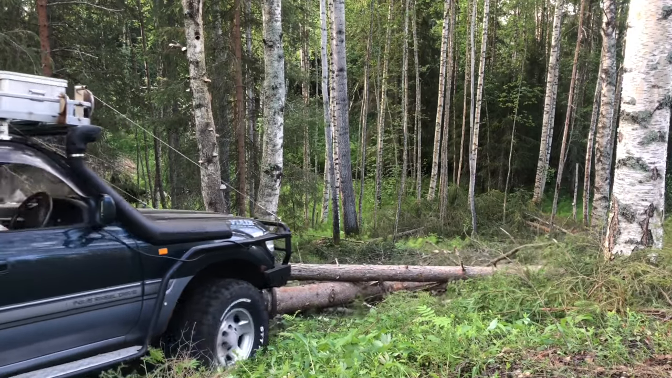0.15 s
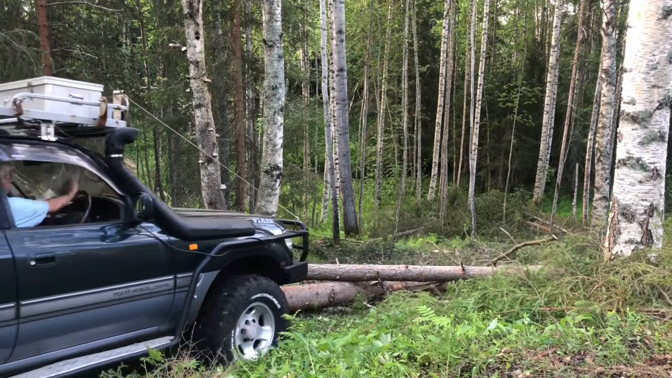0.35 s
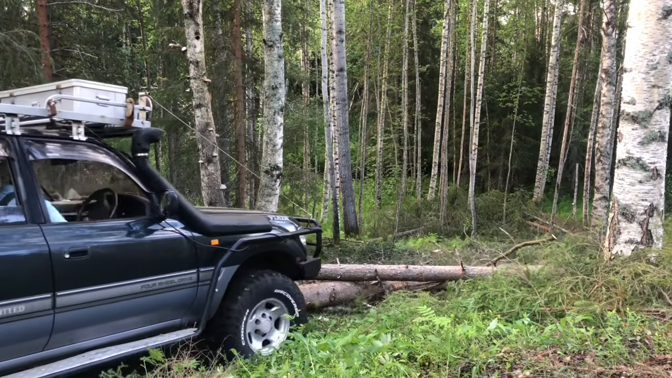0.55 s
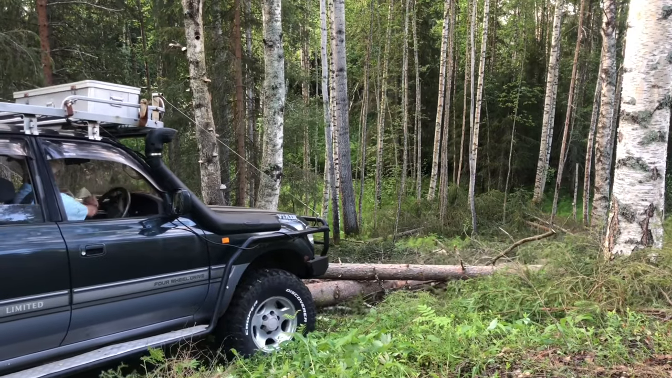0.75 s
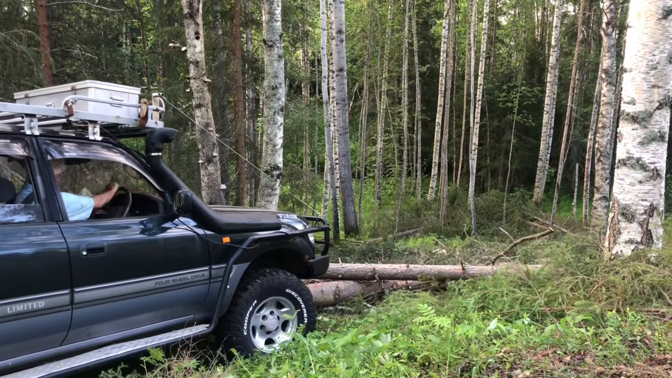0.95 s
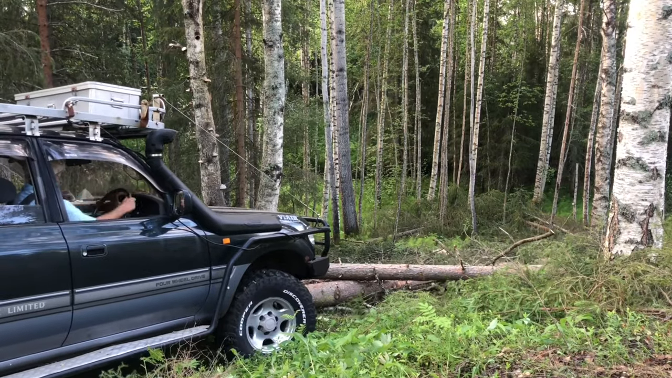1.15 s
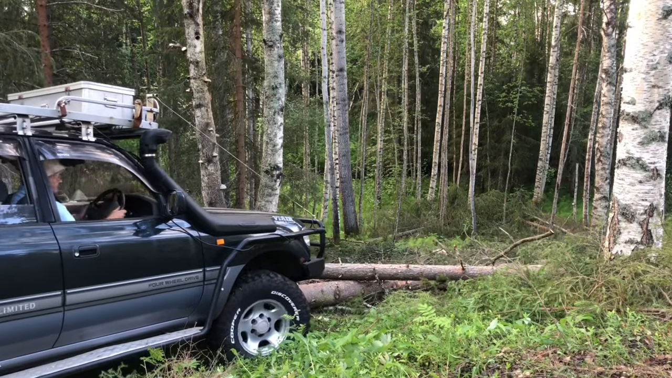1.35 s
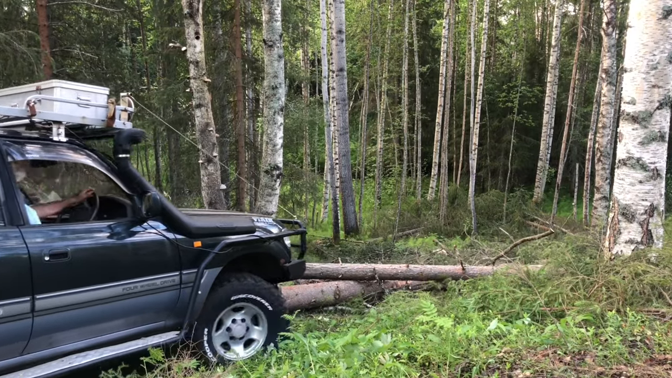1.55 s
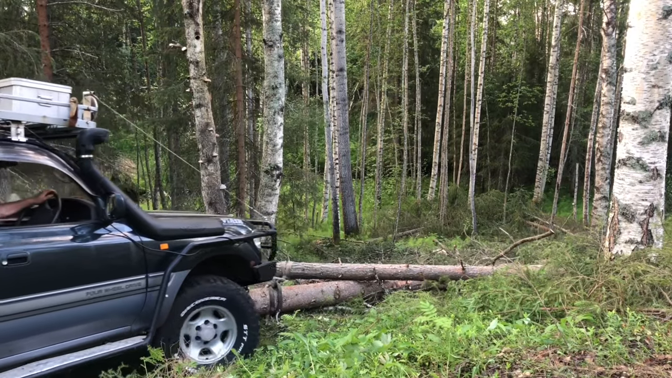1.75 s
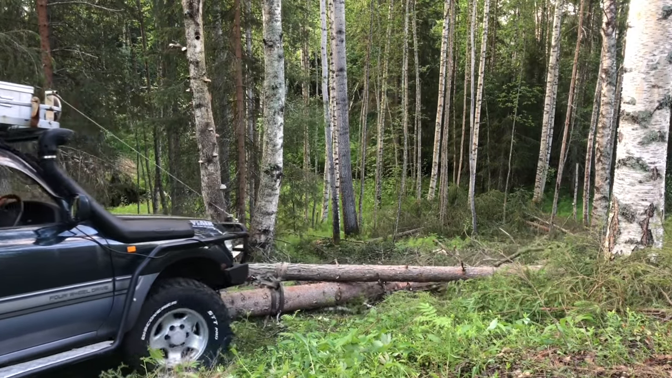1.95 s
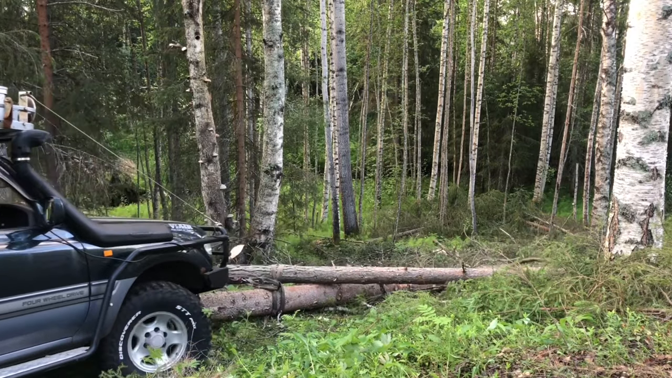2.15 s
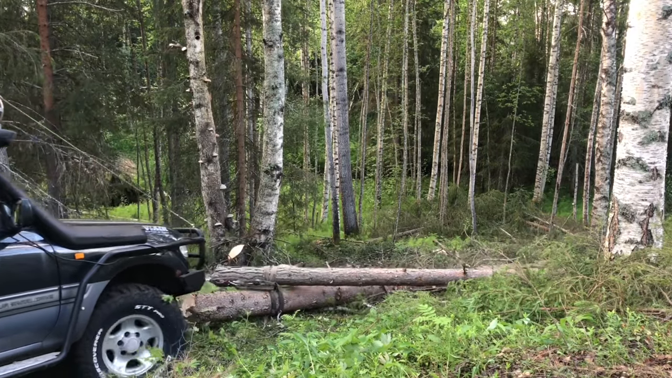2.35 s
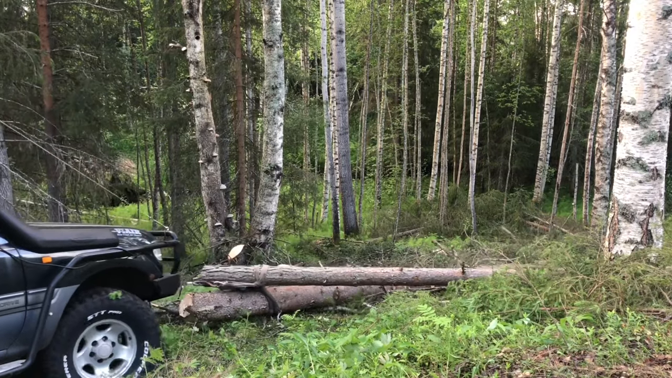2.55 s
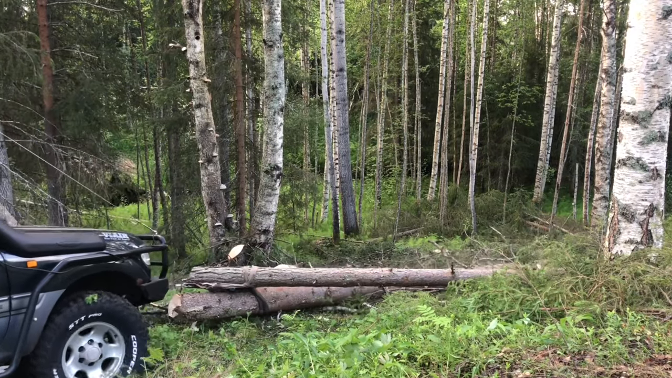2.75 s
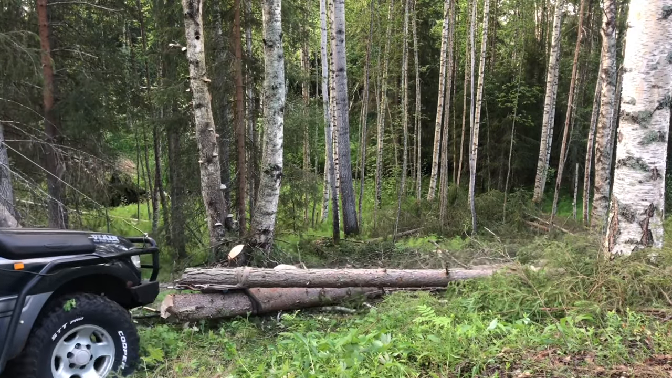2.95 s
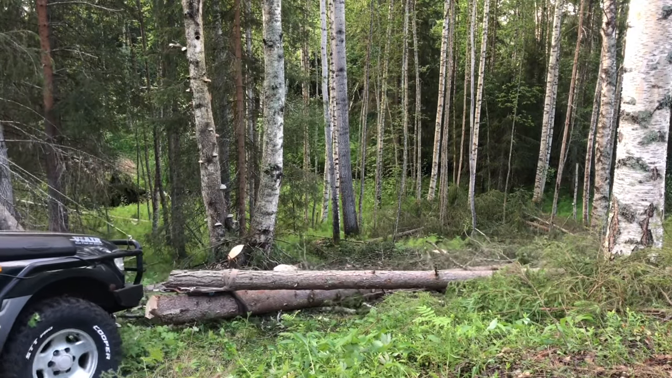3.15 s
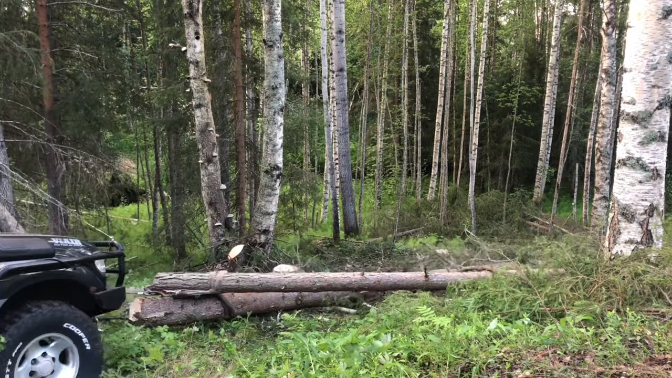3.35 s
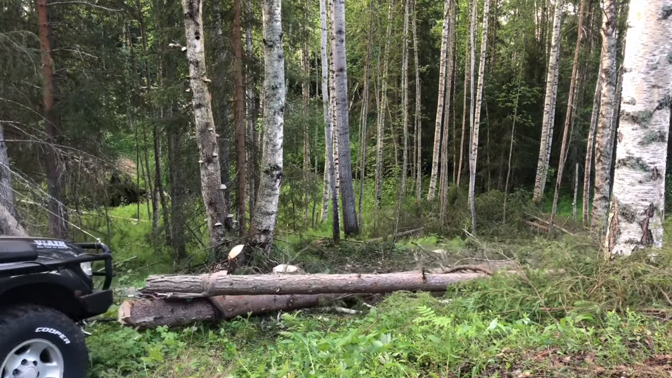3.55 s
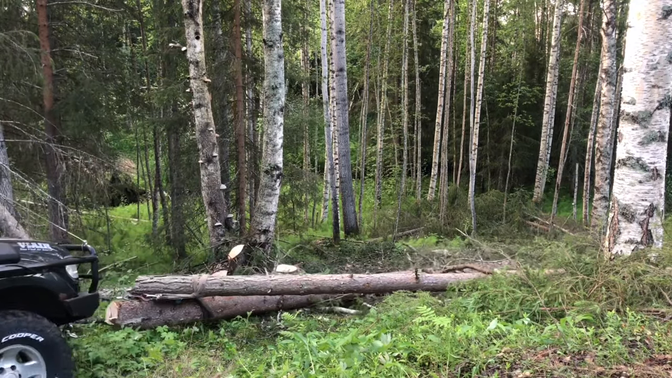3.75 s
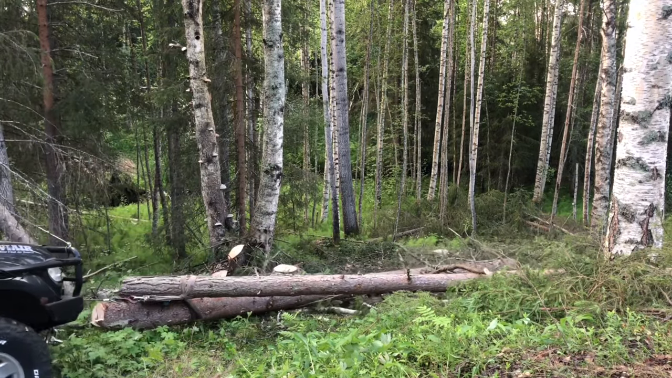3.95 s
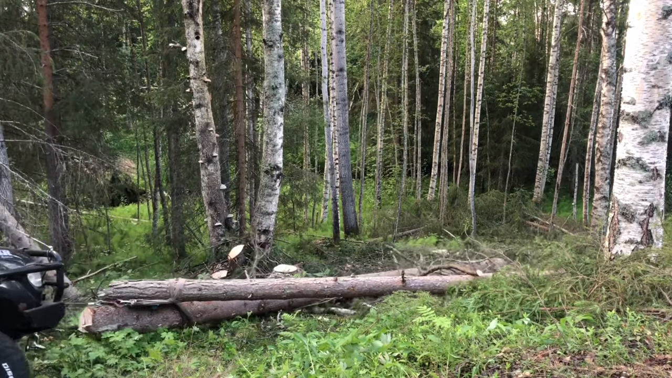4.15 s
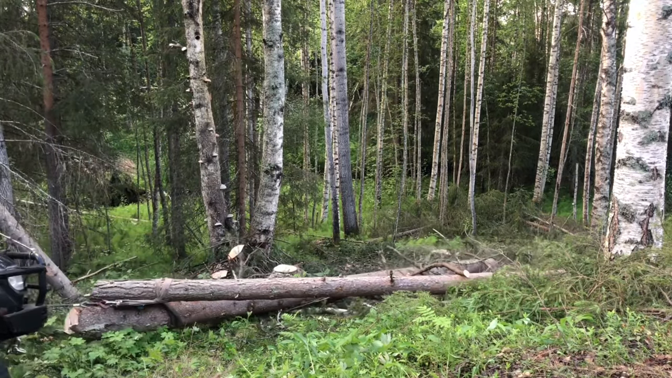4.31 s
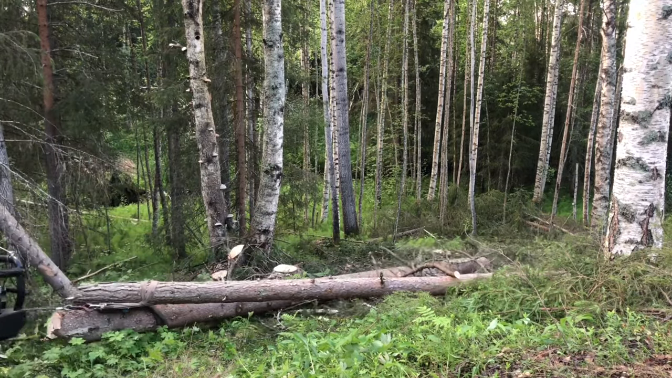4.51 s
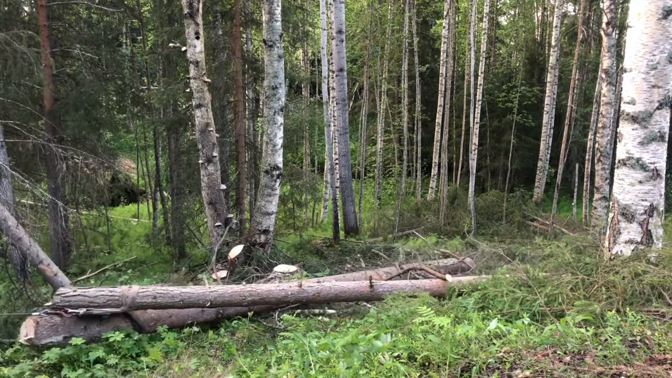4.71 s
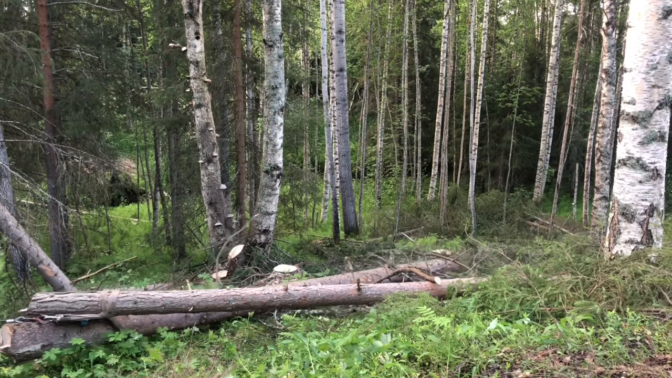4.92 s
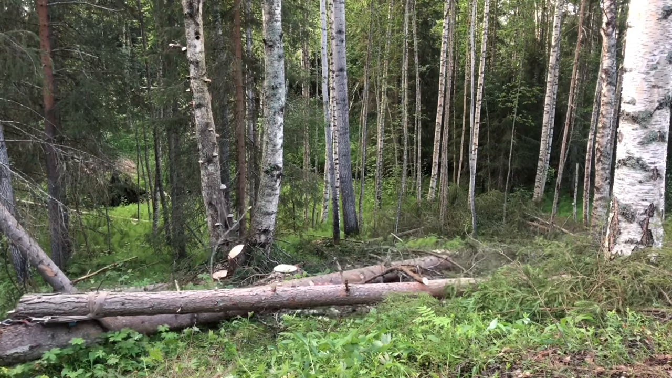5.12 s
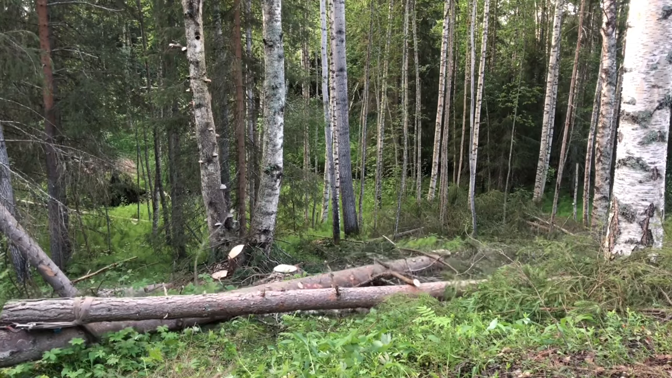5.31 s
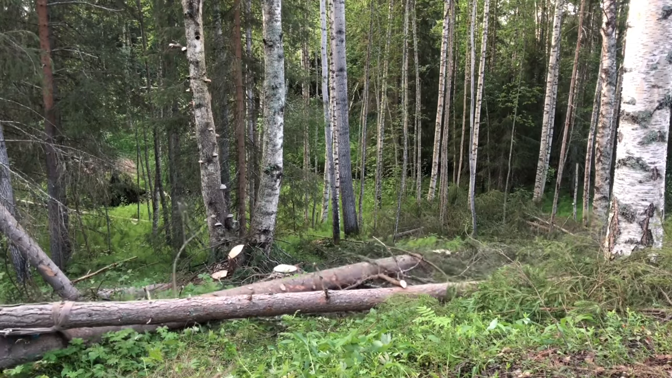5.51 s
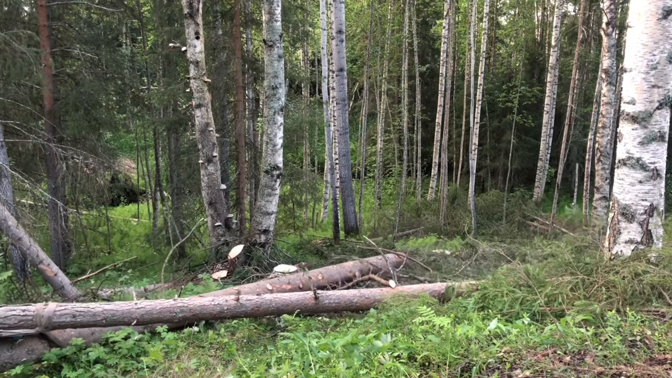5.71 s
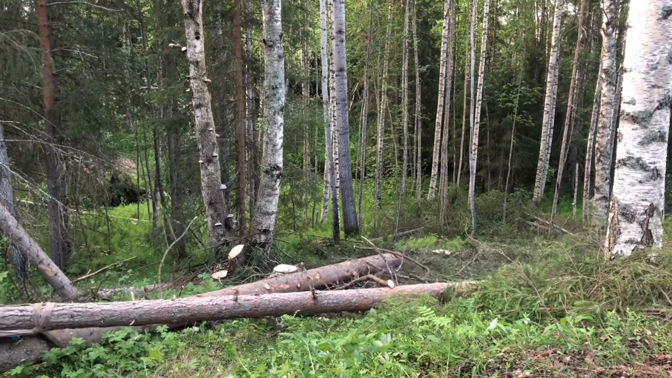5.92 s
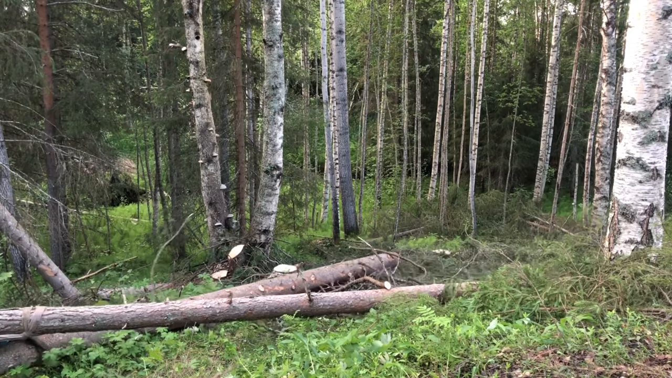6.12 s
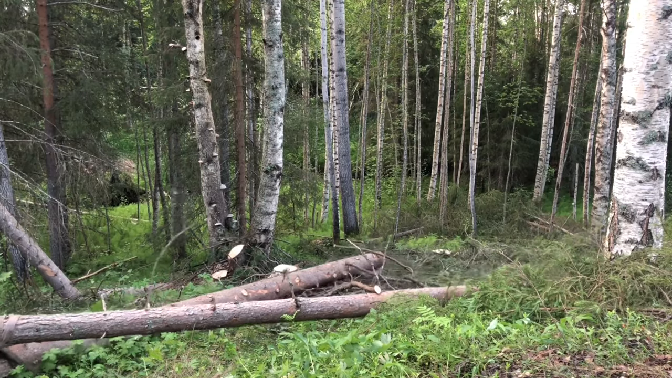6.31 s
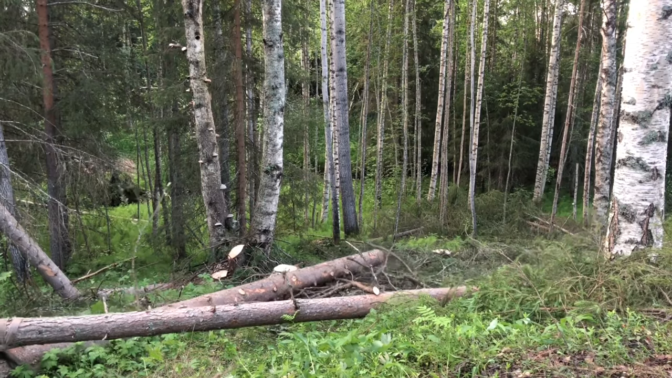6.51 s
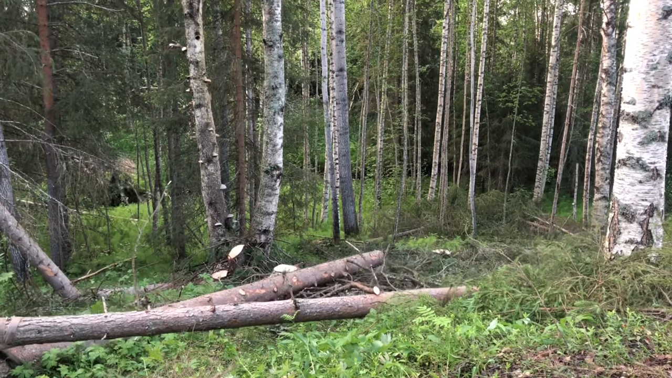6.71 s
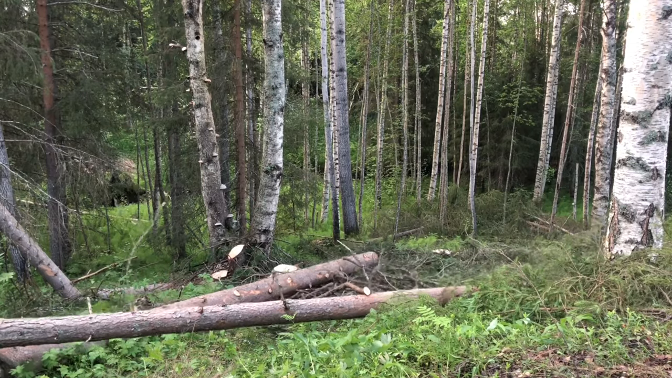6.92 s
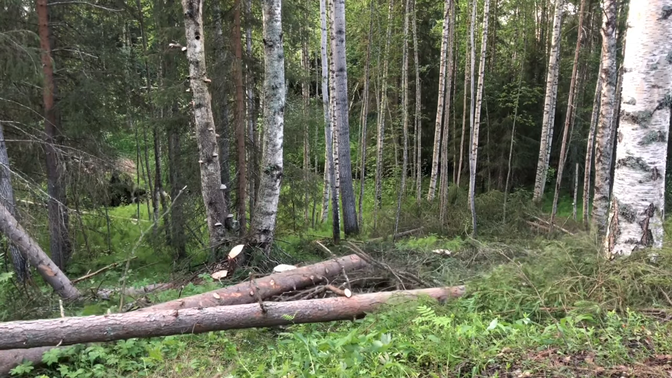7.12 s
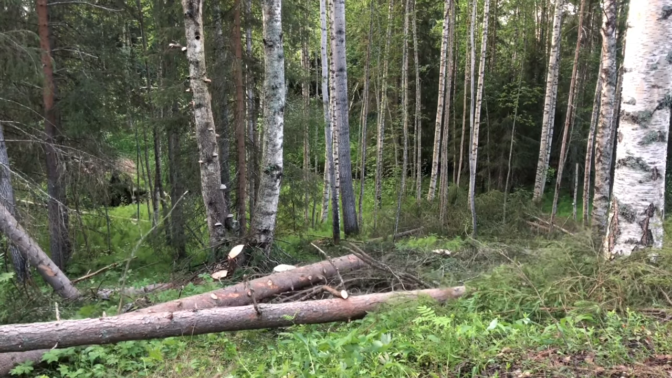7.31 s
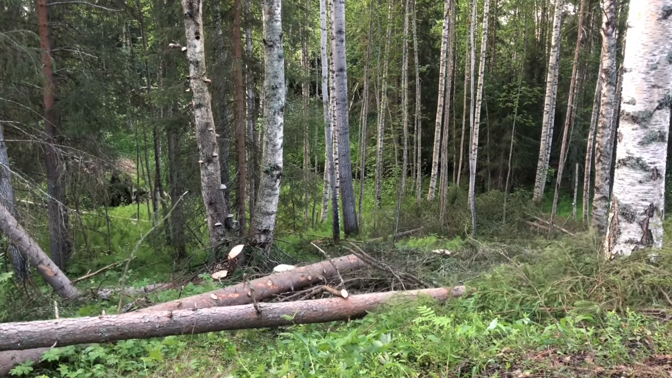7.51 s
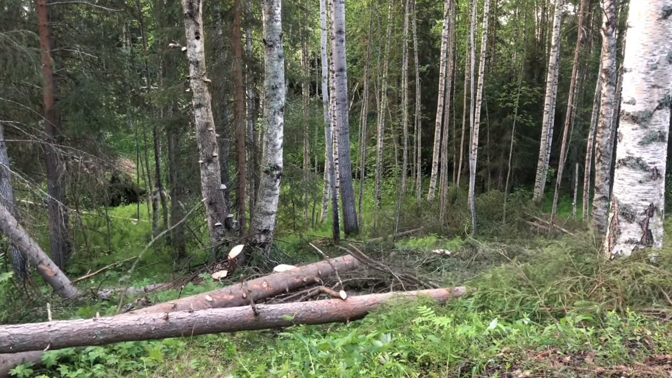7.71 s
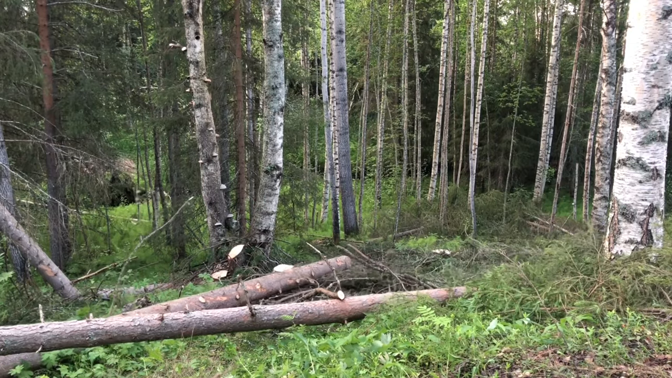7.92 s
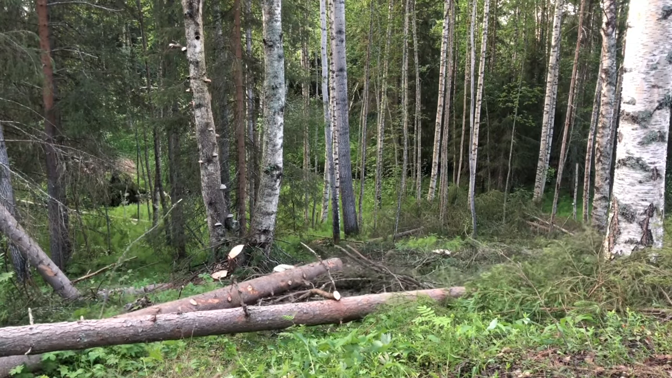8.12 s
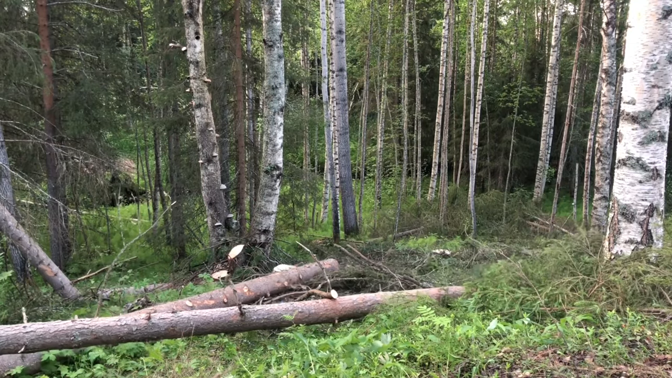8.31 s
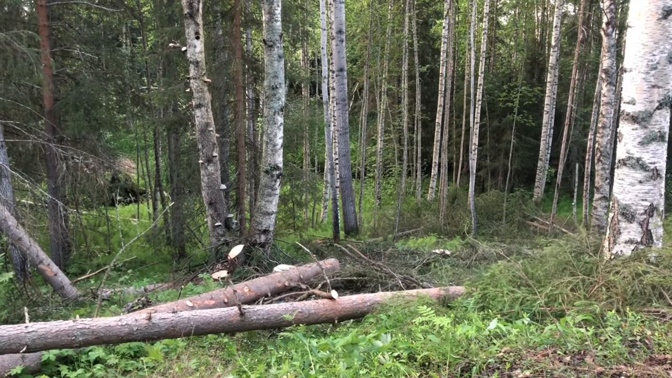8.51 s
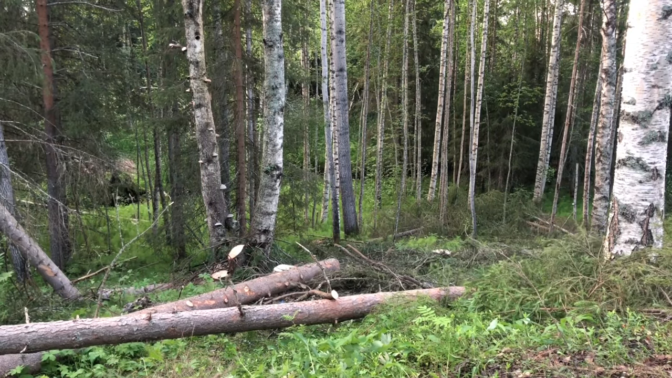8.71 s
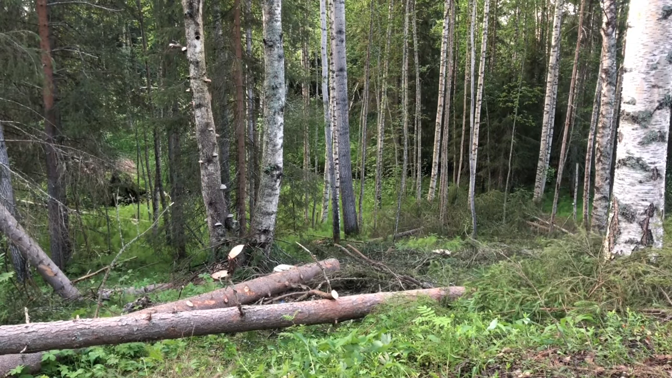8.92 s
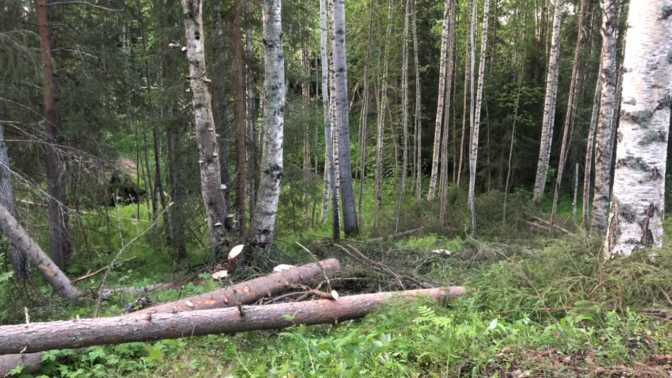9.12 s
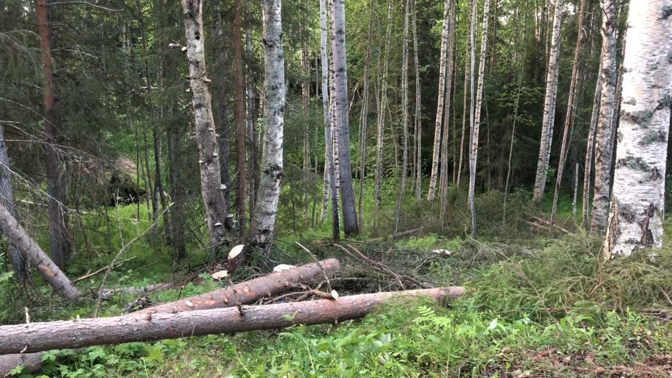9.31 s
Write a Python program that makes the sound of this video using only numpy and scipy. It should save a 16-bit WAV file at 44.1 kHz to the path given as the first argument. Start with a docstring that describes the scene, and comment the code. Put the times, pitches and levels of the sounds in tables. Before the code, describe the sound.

In a forest, an off-road vehicle backs past a stationary microphone, towing logs. Quiet idle gives way to rising throttle surges, a sustained heavy pull, then separate booming revs that drop between presses. Leaves swish, twigs snap, branches crack in dense bursts, sticks ring briefly and timber thuds dully. Late on, the engine sinks back to idle with a few last scrapes.

```python
"""A six-cylinder four-wheel-drive reverses past in a forest, towing logs through the undergrowth.
Its engine idles, then booms in surges of throttle: tones and noise locked to the engine cycle make exhaust,
clatter and fan. Brush rustles and crackles as filtered noise and random snaps; branches splinter as dense
swarms of snaps, logs knock as duller ones, and sticks ring as resonating noise.
The trunks scatter the sounds of the wood and leaves back as a short, soft echo."""
import sys
import numpy as np
from scipy import signal
from scipy.fft import rfft, irfft, next_fast_len
from scipy.io import wavfile
from scipy.ndimage import uniform_filter1d

SR = 44100
rng = np.random.default_rng(int(sys.argv[2]) if len(sys.argv) > 2 else 0)


def persist_wave(psi):
    """Save psi, clipped to +-1, as 16-bit WAV."""
    counts = np.round(np.clip(psi, -1, 1) * 32767).astype(np.int16)
    wavfile.write(sys.argv[1], SR, np.atleast_2d(counts).T)


N = 412754
T = np.arange(N) / SR

# Engine speed here is the rate of one three-cylinder bank, half the firing rate.
IDLE_HZ = 30.07
# throttle surges: (pedal down [s], rise time [s], speed aimed for [Hz], pedal held [s],
# fall time [s], speed it drops towards [Hz])
THROTTLE_SURGES = [(1.214, .125, 43.5, .363, .202, 36.4), (2.03, .151, 48.4, .344, .161, 40.6),
                   (2.638, .18, 55.1, 2.144, .112, 45.4), (4.927, .203, 57.7, .411, .254, 33.1),
                   (5.704, .262, 61.3, .468, .108, 27.2), (6.413, .298, 60.8, .505, .197, 27),
                   (7.224, .158, 51.9, .892, .109, 27.9)]
# the logs drag and ease during the long pull: (time [s], change of engine speed [Hz])
LOG_DRAG = [(3.26, 0), (3.48, -1.24), (3.93, 1.5), (4.34, -0.44), (4.76, 2.5), (5.0, 0)]
# idle levels as the vehicle moves past: (time [s], firing tone [dB], pipe [dB], clatter [dB])
PASSING_LEVELS = [(0, -32, -40.5, -46.5), (1.2, -31, -41.5, -47), (2.3, -31.5, -40.5, -47.5),
                  (3.2, -37, -41, -46), (4.2, -31, -42.5, -46), (5.3, -31, -41.5, -46),
                  (6.3, -34, -41.5, -49), (6.9, -31.5, -40.5, -49), (7.9, -34, -39.5, -48.5),
                  (8.5, -33.5, -42, -48.5), (9.35, -30, -41.5, -48.5)]
# unevenness of the cylinders, before the pipe: (multiple of the four-stroke cycle, relative level [dB])
UNEVEN_FIRING = [(5, -6.5), (7, -28), (8, 5), (9, 1.5), (10, -4), (11, -0.5), (12, 6.5), (13, 2), (14, -7),
                 (15, 3), (17, -2), (18, -1), (19, -4), (20, -1), (21, -4), (24, -2), (27, -0.5)]
# resonances of the exhaust pipe: (pitch [Hz], width [Hz], relative level [dB])
PIPE_RESONANCES = [(94, 19, 3.5), (147, 12.4, 4.5), (204, 30, -12), (252.2, 9.5, -9.5), (373, 160, -19),
                   (451.5, 60, -22)]
# colour of the exhaust gas: (frequency [Hz], relative level per Hz [dB])
GAS_COLOUR = [(65, 8.5), (85, -8), (110, 5.0), (150, -1.5), (185, -1.5),
              (240, -14.0), (310, -16.5), (900, -44), (5000, -77)]
# colour of valves and fan: (frequency [Hz], relative level per Hz [dB])
CLATTER_COLOUR = [(150, -2.5), (310, -5.5), (390, -2.5), (520, -4), (660, -4.5), (850, -1), (1080, 0.5),
                  (1250, -0.5), (1520, -2), (1720, -6), (2300, -14), (3500, -17), (7000, -26.5),
                  (15000, -67)]
# gear whines: (multiple of the four-stroke cycle, relative level at top speed [dB])
GEAR_WHINE_TONES = [(27, -16.5), (51, -15.5), (54, -14), (63, -16), (78, -26)]
# undergrowth being pushed flat: (time [s], rustle level at idle [dB])
BRUSH_LEVELS = [(0, -56.5), (.13, -49), (.38, -58.5), (.63, -54.5), (1.1, -59), (1.5, -56), (1.8, -57.5),
                (2.5, -57), (3.15, -50), (3.55, -54), (4.7, -51), (5.8, -53), (6.33, -53), (6.5, -55.5),
                (7.4, -55), (8.2, -52.5), (8.55, -59), (9.35, -59)]
# colour of leaves and twigs: (frequency [Hz], relative level per Hz [dB])
RUSTLE_COLOUR = [(800, -5), (2000, 3.5), (2450, 0), (2950, 0.5), (3400, -3), (3900, -0.5), (4700, -2),
                 (5600, 1), (7000, -2.5), (9000, -1), (10800, -4), (12000, -3), (15500, -6)]
# splintering branches: (time [s], woody body level [dB], crack level [dB], splinter level [dB])
BRANCH_CRACKS = [(.174, -53, -54, -51.5), (.962, -54, -51, -54), (2.071, -56, -47.5, -56),
                 (2.184, -45, -53, -54), (2.307, -53, -48.5, -52), (2.457, -61, -46, -48),
                 (2.516, -36, -38, -36), (2.589, -46, -42.5, -61), (2.636, -52, -46, -46),
                 (2.76, -63, -35.5, -40.5), (3.102, -38, -38.5, -37), (3.172, -62, -41.5, -44),
                 (3.3, -50, -42, -50), (3.707, -42, -37.5, -43), (4.165, -63, -61, -44.5),
                 (4.274, -55, -61, -43), (4.605, -52, -47, -43), (4.738, -58, -43, -41),
                 (4.808, -50, -43, -39), (4.897, -67, -64, -41), (4.995, -44, -40.5, -68),
                 (5.159, -48, -37.5, -44), (5.348, -48, -41.5, -48), (5.379, -54, -39, -40),
                 (6.05, -43, -32, -39.5), (6.291, -38, -34.5, -37.5), (6.384, -47, -42.5, -42),
                 (6.898, -50, -51, -41), (7.044, -57, -46, -47), (7.118, -59, -37.5, -32.5),
                 (8.049, -35.5, -47, -47.5), (8.205, -58, -45, -52), (8.253, -46, -45, -46.5)]
# ranges for woody body, crack and splinter: (lower edge [Hz], upper edge [Hz])
BRANCH_BANDS = [(950, 2500), (2500, 6200), (6200, 17000)]
# dull knocks and scrapes of timber: (time [s], level [dB], half length [s])
TIMBER_KNOCKS = [(0.858, -41.5, 0.012), (0.944, -42.5, 0.033), (2.46, -32, 0.016), (2.51, -37, 0.011),
                 (3.104, -34.5, 0.018), (8.764, -44.5, 0.051), (8.854, -43.5, 0.024), (9.304, -42, 0.021),
                 (9.35, -43, 0.028)]
# colour of heavy timber: (frequency [Hz], relative level per Hz [dB])
TIMBER_COLOUR = [(100, -8.5), (280, -0.5), (400, -12), (600, -10), (800, -8), (1400, -15), (2200, -14.5),
                 (3000, -27), (4200, -23.5), (8000, -31.5), (15000, -50)]
# sticks and timber that ring briefly: (time [s], pitch [Hz], width [Hz], level [dB])
RINGING_STICKS = [(.93, 790, 130, -41), (.96, 4100, 297, -50), (1.04, 510, 70.5, -46),
                  (2.457, 4270, 400, -40), (2.515, 1120, 300, -32), (2.515, 2480, 700, -33.5),
                  (2.516, 4200, 1300, -30), (4.277, 3100, 600, -40.5), (5.377, 4360, 400, -35),
                  (6.05, 1880, 350, -34.5), (8.046, 1300, 201, -33.5), (8.046, 2730, 500, -41.5)]

# effort is roughly the speed that the engine is heading for, this far ahead
EFFORT_LEAD_S = 0.022
# the boom grows steeply with effort up to a knee, and slowly beyond it
BOOM_KNEE_HZ, BOOM_KNEE_DB, BOOM_BELOW_DB_PER_HZ, BOOM_ABOVE_DB_PER_HZ = 49.9, -20.5, 2, 0.49
# a sudden lift of the pedal chokes the boom: run-down at which that starts, and how steeply
CHOKE_HZ_PER_S, CHOKE_DB_PER_HZ_PER_S = 105, 0.2
# the firing tone swells under a hard pull and drops while the engine runs down
HARD_PULL_HZ, FIRING_DB_PER_HZ, OVERRUN_DB_PER_HZ_PER_S = 50.4, 0.71, 0.11
# growth with each doubling of effort
PIPE_GROWTH_DB, CLATTER_GROWTH_DB, RUSTLE_GROWTH_DB = 4.5, 6.5, 5
GAS_DB, VALVES_DB = -3.5, -5  # against the pipe's tones and against the fan
# small twigs stir the brush at random: how often, weakest level against the rustle, range, half length
TWIGS_PER_S, TWIG_MIN_DB, TWIG_RANGE_DB, TWIG_S = 8, -0.5, 5, 0.011
# a breaking branch shakes the leaves round it: level against its loudest range, and half length
SHAKE_DB, SHAKE_S = -11.5, 0.054
BUILD_UP_S = 0.014  # a branch gives way, and falls silent, over about this time
TOP_HZ = 15500  # upper limit of the microphone


def undb(db):
    """Turn decibels into gain."""
    return 10 ** (np.asarray(db) / 20)


def unit(x):
    """Scale to an average strength (rms) of 1."""
    return x / np.sqrt(np.mean(x ** 2))


def curves(table):
    """Draw each column of a table as a line through time."""
    times, *columns = np.transpose(table)
    return [np.interp(T, times, column) for column in columns]


def noise():
    """Make plain hiss, equally strong at all frequencies."""
    return rng.standard_normal(N)


def walk(rate):
    """Wander smoothly at random, with an rms of 1; rate is how many new values come each second."""
    step = max(int(SR / rate), 2)
    stairs = np.repeat(rng.standard_normal(N // step + 1), step)
    smooth = uniform_filter1d(uniform_filter1d(stairs, step), step)
    return unit(smooth[:N])


def colour(x, points):
    """Filter by a smooth spectrum drawn through the points, with less bass below the first one."""
    size = next_fast_len(N + 4096)
    hz, db = np.transpose(points)
    f = np.maximum(np.arange(size // 2 + 1) * SR / size, 1)
    gain = undb(np.interp(np.log(f), np.log(hz), db))
    gain = gain * np.minimum(f / hz[0], 1) ** 2
    return unit(irfft(rfft(x, size) * gain, size)[:N])


def ring(x, modes):
    """Make a set of resonances sound by driving them with x."""
    total = 0
    for hz, width, db in modes:
        b, a = signal.iirpeak(hz, hz / width, fs=SR)
        total = total + undb(db) * signal.lfilter(b, a, x)
    return unit(total)


def grains(rate, spread_db):
    """Scatter tiny snaps at random: a positive spread makes a few stronger, a negative one a few weaker."""
    sizes = undb(spread_db * np.minimum(rng.exponential(size=N), 4))
    happens = rng.random(N) < rate / SR
    return unit(happens * sizes * rng.choice([-1, 1], N))


def swell(at, width):
    """Shape a burst with a rounded peak that builds and falls away over about one width each side."""
    out, width = np.zeros(N), max(width, 1e-3)
    near = slice(*np.searchsorted(T, [at - 10 * width, at + 10 * width]))
    out[near] = np.exp(2 - 2 * np.hypot(1, (T[near] - at) / width))
    return out


def speed():
    """Each press of the pedal winds the engine up, each release lets it run down; the load tugs at it."""
    hz = np.full(N, float(IDLE_HZ))
    for down, rise_s, top_hz, held_s, fall_s, rest_hz in THROTTLE_SURGES:
        for at, lag, goal in ((down, rise_s, top_hz), (down + held_s, fall_s, rest_hz)):
            hz = goal + (hz - goal) * np.exp(-np.clip((T - at) / lag, 0, 10) ** 2)
    return hz + curves(LOG_DRAG)[0]


def exhaust_levels(bank_hz, effort_hz):
    """Hard work raises the boom and the firing tone; running down lowers them."""
    over = effort_hz - BOOM_KNEE_HZ
    run_down = np.maximum(-np.gradient(bank_hz) * SR, 0)
    boom_db = BOOM_KNEE_DB + over * np.where(over < 0, BOOM_BELOW_DB_PER_HZ, BOOM_ABOVE_DB_PER_HZ)
    choke_db = CHOKE_DB_PER_HZ_PER_S * np.maximum(run_down - CHOKE_HZ_PER_S, 0)
    pull_db = FIRING_DB_PER_HZ * np.maximum(effort_hz - HARD_PULL_HZ, 0)
    return boom_db - choke_db, pull_db - OVERRUN_DB_PER_HZ_PER_S * run_down


def exhaust(bank, boom_db, firing_db, pipe_db):
    """Under throttle the two banks blow unequally and boom; uneven firings ring the pipe."""
    turn = 2 * np.pi * bank
    # the second, fainter tone makes the boom throb once in each four-stroke cycle
    throb = undb(-27 + 4 * walk(5)) * np.sin(turn * 4 / 3)
    boom = undb(boom_db + 0.25 * walk(30)) * (np.sin(turn) + throb)
    firing = undb(firing_db + 1.1 * walk(35)) * np.cos(2 * turn - np.pi / 4)
    tones = 0
    for k, db in UNEVEN_FIRING:
        tones = tones + undb(db + 2 * walk(7.4)) * np.sin(k * turn / 3 + rng.uniform(0, 2 * np.pi))
    uneven = ring(tones, PIPE_RESONANCES)
    # even out the joint strength of the tones, so that pipe_db alone sets it
    uneven = uneven / np.sqrt(uniform_filter1d(uneven ** 2, size=8000))
    # one fading puff of gas for each firing
    puffs = unit(noise() * np.exp(-(2 * bank % 1) / 0.55))
    pipe = uneven + undb(GAS_DB) * colour(puffs, GAS_COLOUR)
    return np.sqrt(2) * (boom + firing) + undb(pipe_db) * pipe


def clatter(bank, clatter_db):
    """Valves and gears whirr on multiples of the engine cycle; the fan rushes over them."""
    orders = np.arange(18, 100)
    # every third multiple belongs to the beat of a bank and stands out
    sizes = np.where(orders % 3 == 0, 1, undb(-8)) * np.exp(2j * np.pi * rng.random(len(orders)))
    cycle = irfft(np.r_[np.zeros(orders[0]), sizes], 4096)
    valves = unit(np.interp(bank / 3 % 1, np.linspace(0, 1, len(cycle)), cycle))
    valves = valves * undb(1.15 * walk(15))
    whine = 0
    for k, db in GEAR_WHINE_TONES:
        whine = whine + np.sqrt(2) * undb(db + 3 * walk(4)) * np.sin(2 * np.pi * k * bank / 3)
    turning = np.gradient(bank)
    whine = whine * (turning / turning.max()) ** 3  # the gears only sing when they turn fast
    # the rush pulses at the firing rate
    fan = noise() * (1.5 + np.exp(-(2 * bank % 1) / 0.28))
    bay = undb(VALVES_DB) * colour(valves, CLATTER_COLOUR) + whine + colour(fan, CLATTER_COLOUR)
    return undb(clatter_db + 0.78 * walk(22)) * unit(bay)


def stirring(rustle_db):
    """Steady pushing, twigs that snap by chance and breaking branches all move the leaves."""
    chance = rng.random((int(TWIGS_PER_S * N / SR), 2))
    twigs = sum(undb(TWIG_MIN_DB + TWIG_RANGE_DB * size) * swell(when * T[-1], TWIG_S)
                for when, size in chance)
    shaken = sum(undb(max(bands_db) + SHAKE_DB) * swell(at, SHAKE_S) for at, *bands_db in BRANCH_CRACKS)
    return np.hypot(undb(rustle_db) * np.hypot(1, twigs), shaken)


def brush(rustle_db):
    """Leaves swish and small twigs crackle in clusters as they are pushed flat."""
    twigs = 0
    for hz in np.geomspace(3200, 13000, 4):
        crackle = ring(grains(rate=1000, spread_db=2.8), [(hz, hz / 2, 0)])
        twigs = twigs + undb(3.2 * walk(40)) * crackle
    leaves = noise() * undb(1.14 * walk(18))
    swish = leaves + undb(-4.5) * unit(twigs)
    return stirring(rustle_db) * colour(swish, RUSTLE_COLOUR)


def forest(x, t60=0.29, wet_db=-13, count=4):
    """Trunks scatter back a short blurred tail, by paths that take turns once a second."""
    t, wet = T[:SR], 0
    for k in range(count):
        # the tail builds up quickly, then dies away by 60 dB in t60 seconds
        tail = rng.standard_normal(SR) * np.exp(-np.log(1000) * t / t60) * (1 - np.exp(-t / 0.022))
        share = np.maximum(np.cos(2 * np.pi * (T + k / count)), 0)
        wet = wet + signal.oaconvolve(x * share, tail / np.linalg.norm(tail))[:N]
    return x + undb(wet_db) * wet


def branches():
    """A branch gives way fibre by fibre: a dense swarm of snaps, coloured by its own wood."""
    out, size = np.zeros(N), 8192
    hz = np.maximum(np.arange(size // 2 + 1) * SR / size, 1)
    fibres = grains(rate=14000, spread_db=-2.0)
    knots = np.geomspace(500, 16000, 44)
    for at, *bands_db in BRANCH_CRACKS:
        start = max(int(at * SR) - size // 2, 0)
        span = slice(start, start + size)
        # each branch gets its own random ups and downs of colour
        wood_db = np.interp(hz, knots, 2 * rng.standard_normal(len(knots)))
        wood = rfft(fibres[span]) * undb(wood_db)
        for (lo, hi), db in zip(BRANCH_BANDS, bands_db):
            window = 1 / (1 + (lo / hz) ** 8) / (1 + (hz / hi) ** 8)
            out[span] += undb(db) * unit(irfft(wood * window)) * swell(at, BUILD_UP_S)[span]
    return out


def logs():
    """Heavy timber bumps and scrapes along the ground as swelling bursts of dull grains."""
    force = sum(undb(db) * swell(at, width) for at, db, width in TIMBER_KNOCKS)
    return force * colour(grains(rate=3000, spread_db=-1.0), TIMBER_COLOUR)


def sticks(build_s=0.012):
    """Dry wood sounds its own pitch while it tears or is bumped."""
    out = np.zeros(N)
    for at, hz, width, db in RINGING_STICKS:
        force = swell(at, build_s)
        rough = ring(noise(), [(hz, 2 * width, 0)])
        tone = ring(rough, [(hz, width, 0)]) * force
        # give every burst the same strength before setting its level
        out += undb(db) * tone * np.linalg.norm(force) / np.linalg.norm(tone)
    return out


def scene():
    """Let engine speed and effort drive the vehicle's sounds, with its load among the trees."""
    bank_hz = speed()
    effort_hz = np.maximum(bank_hz + EFFORT_LEAD_S * np.gradient(bank_hz) * SR, 1)
    octaves = np.log2(effort_hz / IDLE_HZ)
    boom_db, pull_db = exhaust_levels(bank_hz, effort_hz)
    firing_db, pipe_db, clatter_db = curves(PASSING_LEVELS)
    rustle_db = curves(BRUSH_LEVELS)[0] + RUSTLE_GROWTH_DB * octaves
    # count the turns of a bank, with a slight wobble of speed
    bank = np.cumsum(bank_hz * (1 + 0.003 * walk(25))) / SR
    engine = exhaust(bank, boom_db, firing_db + pull_db, pipe_db + PIPE_GROWTH_DB * octaves)
    engine = engine + clatter(bank, clatter_db + CLATTER_GROWTH_DB * octaves)
    undergrowth = brush(rustle_db) + branches() + sticks() + logs()
    return (engine + forest(undergrowth))[None]


def record(dry):
    """The microphone loses the deepest bass and the very top."""
    dry = signal.sosfilt(signal.butter(1, 12, "high", fs=SR, output="sos"), dry)
    return signal.sosfilt(signal.ellip(10, 0.1, 80, TOP_HZ, fs=SR, output="sos"), dry)


dry = scene()
out = record(dry)
persist_wave(out)
```